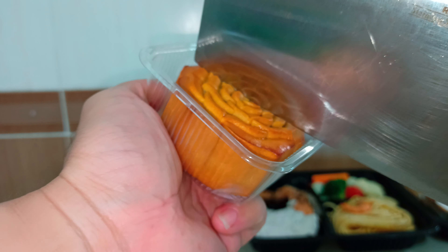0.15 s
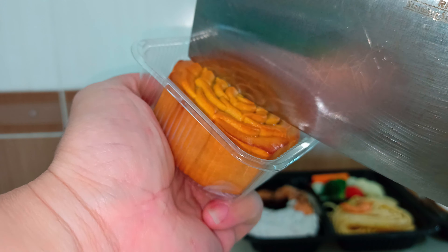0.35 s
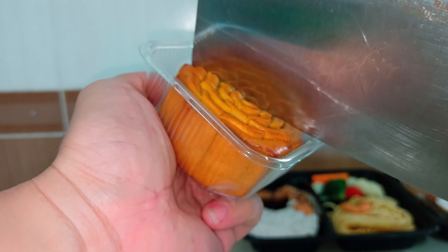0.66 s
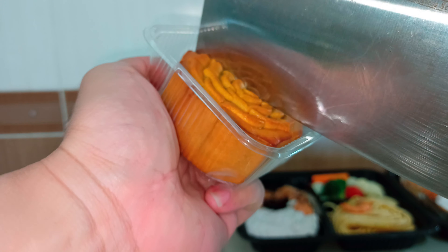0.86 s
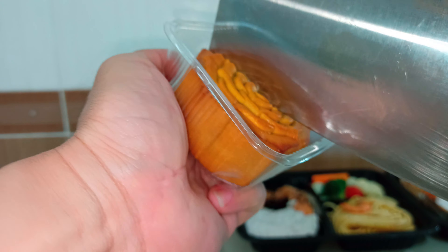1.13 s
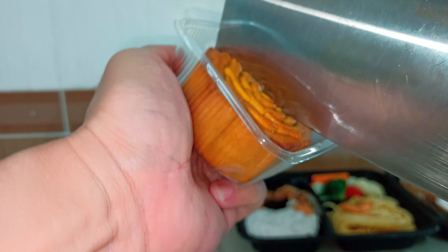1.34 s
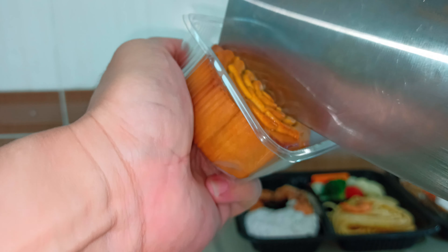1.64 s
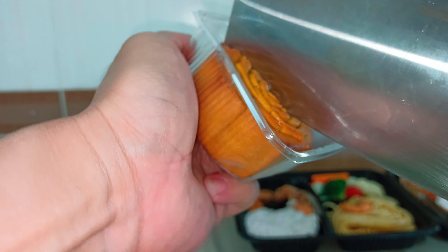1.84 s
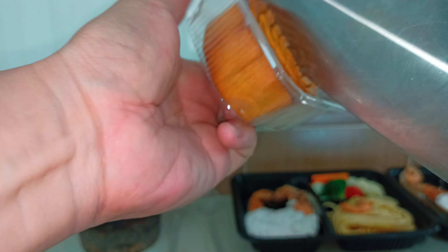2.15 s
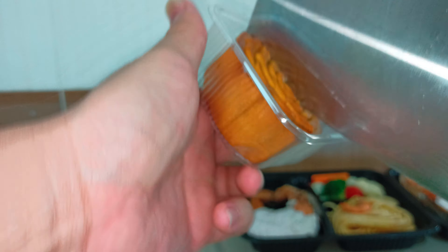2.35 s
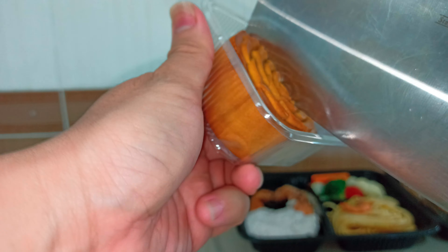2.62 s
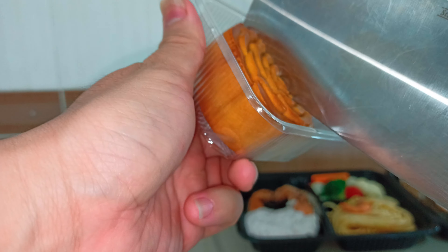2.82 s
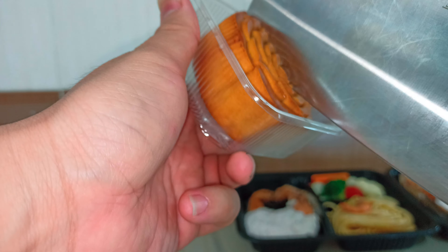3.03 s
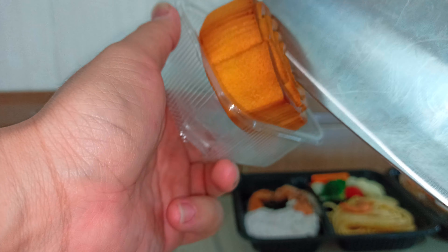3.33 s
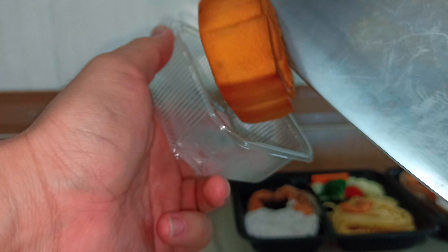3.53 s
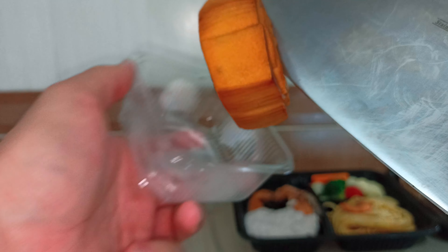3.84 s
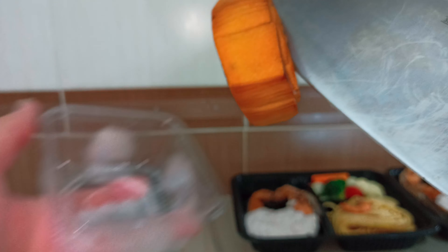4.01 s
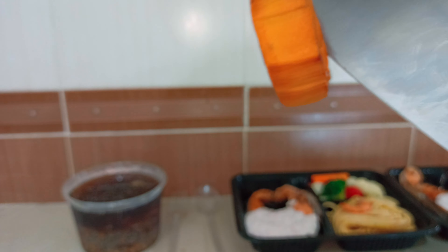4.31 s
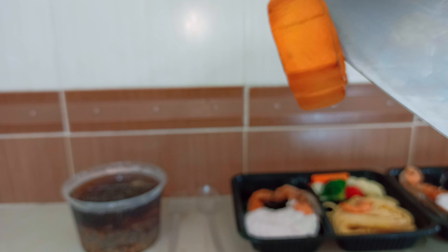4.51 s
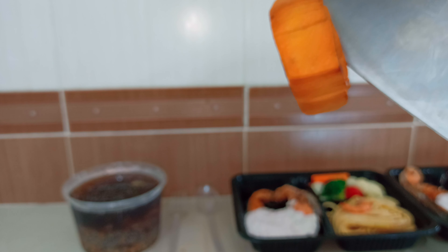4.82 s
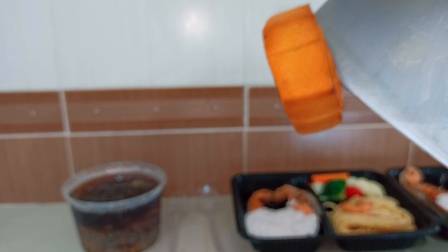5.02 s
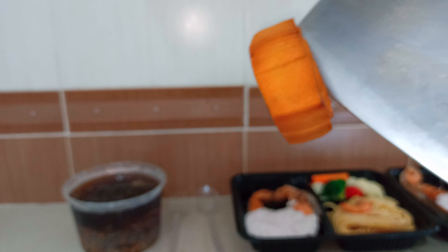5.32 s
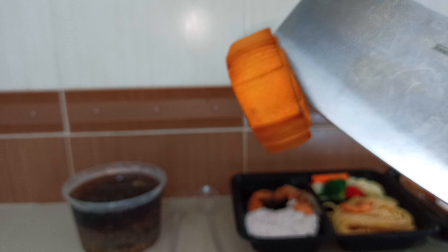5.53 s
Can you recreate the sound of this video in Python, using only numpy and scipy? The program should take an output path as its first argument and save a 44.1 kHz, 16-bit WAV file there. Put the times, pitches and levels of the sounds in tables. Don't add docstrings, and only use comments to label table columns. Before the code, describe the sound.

A close, dry-edged capture in a tiled kitchen, with soft room air and a low wavering machine hum throughout, slightly stronger until about 3 s. A thin plastic tray ticks faintly from the start, then snaps loudly and crisply at 0.33, 0.51 and 0.65 s, each with a short bright room tail. Fingers rub near 0.9 s amid scattered small ticks; at 1.45 s a bright crunch lands with a hollow, slightly ringing knock. From 2.0 to 2.15 s the walls crackle in a rapid burst, ending in the loudest, hard double snap with a low thud. Lighter ticks and dull skin rubbing thin out through 3.4 s. It is nearly quiet until about 4.4 s, apart from a faint brush and tick near 4.1 s. Hissier finger slides and small ticks follow until 5.2 s. From 5.3 to 5.6 s something soft crumples in two quick crunchy pulses and fades.

```python
import sys
import numpy as np
from scipy import signal
from scipy.fft import rfft, irfft
from scipy.io import wavfile
from scipy.ndimage import uniform_filter1d, minimum_filter1d

SR = 44100
rng = np.random.default_rng(int(sys.argv[2]) if len(sys.argv) > 2 else 0)


def materialize(psi):
    bounded = np.clip(np.atleast_2d(psi).T, -1, 1)
    quanta = np.round(bounded * 32767).astype(np.int16)
    wavfile.write(sys.argv[1], SR, quanta)


def to_linear_factor(level_db):
    exponent = np.asarray(level_db, float) / 20
    return 10 ** exponent


N = 249606

BAND_HZ = [2830, 4430, 7170, 15100]


def evened(x):
    return x / np.sqrt(np.mean(x ** 2) + 1e-20)


def read(points, hz):
    f, value = np.transpose(points)
    return np.interp(np.log(hz + 1), np.log(f + 1), value)


def coloured(x, points):
    gain = to_linear_factor(read(points, np.fft.rfftfreq(len(x), 1 / SR)))
    return irfft(rfft(x) * gain, len(x))


def add(mix, start_s, sound):
    part = mix[round(start_s * SR):][:len(sound)]
    part += sound[:len(part)]


def ring(hz, db, t60_s, size=4096):
    t = np.arange(size) / SR
    return to_linear_factor(db - 60 * t / t60_s) * np.sin(2 * np.pi * hz * t)


def grains(spread_db):
    flicker = evened(uniform_filter1d(rng.exponential(1, N) - 1, 40))
    return rng.standard_normal(N) * to_linear_factor(spread_db * np.minimum(flicker, 2))


def hum():
    # frequency [Hz], level per Hz [dB]
    air_colour = [(12, -47.5), (20, -20), (147, -0.5), (189, -10), (251, -5), (566, -16.5), (1430, -25),
                  (1790, -23.5), (2010, -30.5), (3620, -29), (6710, -36.5), (7950, -31.5), (9950, -46.5),
                  (15200, -40.5), (16500, -60)]
    # time [s], level [dB]
    rumble = [(0.0, -50.5), (.6, -47), (1.95, -46), (2.16, -44.5), (2.55, -46), (2.96, -46), (3.21, -51.5),
              (3.85, -54), (5.23, -55), (5.53, -47), (5.66, -52.5)]
    # frequency [Hz], width [Hz], level [dB]
    lines = [(48.6, 10, -67.5), (96.9, 11, -59.5), (145.6, 4, -56), (242.2, 7.7, -64), (298, 11, -64),
             (389, 15, -66), (486.3, 7.3, -64), (1815, 7, -76), (8000, 940, -76.5)]
    hz, t = np.fft.rfftfreq(N, 1 / SR), np.arange(N) / SR
    air = to_linear_factor(-53) * evened(coloured(rng.standard_normal(N), air_colour))
    s, db = np.transpose(rumble)
    swell = to_linear_factor(np.interp(t, s, db) - min(db))
    low = coloured(air, [(450, -3.0), (900, -18)])
    out = air + (swell - 1) * low
    for line_hz, width_hz, line_db in lines:
        resonance = 1 + (2 * (hz - line_hz) / width_hz) ** 2
        line = evened(irfft(rfft(rng.standard_normal(N)) / resonance, N))
        if width_hz < 100:
            line = line + 1.3 * np.sin(2 * np.pi * (line_hz * t + rng.random()))
        out += to_linear_factor(line_db) * evened(line)
    return out


def fingers():
    # frequency [Hz], level per Hz [dB]
    rub_colour = [(350, -36.5), (600, -11), (961, 2), (1580, -5.5), (8250, -3.5), (10400, -14.5),
                  (14200, -10.5), (15800, -8), (16500, -26)]
    # time [s], pressure as level [dB]
    grip = [(0.0, -76), (.118, -69), (.32, -63), (.6, -76), (.8, -63), (.896, -47.5), (1.062, -51),
            (1.236, -63), (1.876, -65), (1.98, -57), (2.3, -50), (2.55, -54), (2.632, -56), (2.844, -59.5),
            (3.016, -56.5), (3.202, -64), (3.45, -70.5)]
    # time [s], pressure as level [dB]
    put_away = [
        (4.36, -64),
        (4.446, -65),
        (4.57, -56),
        (4.74, -63),
        (4.948, -67),
        (5.18, -73),
        (5.28, -68),
    ]
    # start [s], length [s], level [dB], hiss over level [dB]
    brushes = [(0.133, 0.052, -58, -18), (0.862, 0.082, -59.5, -2), (2.62, .06, -65, -3),
               (3.104, .066, -63, -8), (3.47, 0.051, -71, 3), (4.04, 0.041, -71, -4),
               (4.399, 0.057, -60, 0), (4.503, .055, -66.5, 2), (4.583, 0.032, -59, -3),
               (4.781, .032, -59.5, -6), (4.905, .051, -62.5, -5), (5.148, 0.054, -62, -8.5)]
    light_db = -59.5
    t = np.arange(N) / SR
    rub = coloured(grains(2.5), rub_colour)
    dull = evened(coloured(rub, [(8000, -7.0), (9500, -20)]))
    bright = evened(coloured(rub, [(8000, -24), (9500, -7.0)]))
    power = np.zeros((2, N))
    for slide, light_hiss_db, slope in ((grip, -76, .3), (put_away, -63.5, 1.1)):
        s, db = np.transpose(slide)
        press_db = np.interp(t, s, db)
        hiss_db = light_hiss_db + slope * (press_db - light_db)
        touching = (t >= s[0]) * (t <= s[-1])
        power += touching * to_linear_factor(np.array([press_db, hiss_db]) - 5.5) ** 2
    for start_s, length_s, db, hiss_db in brushes:
        touching = (t >= start_s) * (t <= start_s + length_s)
        power += touching * to_linear_factor(np.array([[db], [db + hiss_db]])) ** 2
    dull_level, bright_level = np.sqrt(abs(uniform_filter1d(power, 500)))
    return dull_level * dull + bright_level * bright


def shares(patch_hz, sparkle_db, focus_db):
    away = np.log2(np.array(BAND_HZ[:-1]) / patch_hz) / 0.65
    return [*(focus_db * (np.exp(-away ** 2) - 1)), sparkle_db]


def snap(row, burst_db, slips_db, slips_t60_s, send_db, boost_db=0.):
    band_db = [1.5, 0, -4, -7.5]
    # frequency [Hz], level [dB], t60 [s]
    wall = [(2870, -9, 0.016), (1780, -10.5, .03), (7400, -20, .012), (4400, -24.5, .015)]
    start_s, peak_db, *patch = row
    t = np.arange(2048) / SR
    release = -1. * (np.arange(len(t)) == 48)
    decay = to_linear_factor(burst_db - 60 * t / .0035) + to_linear_factor(slips_db - 60 * t / slips_t60_s)
    slips = rng.standard_normal(len(t)) * decay
    slips = release + np.roll(slips, 50) * (np.arange(len(t)) > 50)
    level_db = np.add(shares(*patch), band_db)
    low_db = level_db[0]
    colour = [(500, low_db - 34.5), (1400, low_db - 17.5), (2000, low_db - 8), *zip(BAND_HZ, level_db)]
    colour.insert(-1, (10500, min(level_db[-2:])))
    modes = sum(ring(hz * rng.uniform(1.0, 1.02), db - 30, t60, size=2048) for hz, db, t60 in wall)
    near, far = (coloured(x + signal.fftconvolve(x, modes)[:len(t)], colour) for x in (slips, release))
    near *= to_linear_factor(peak_db + boost_db) / abs(near).max()
    far *= to_linear_factor(send_db) * np.linalg.norm(near) / np.linalg.norm(far)
    return start_s, near, far


def tray():
    # start [s], peak [dB], patch pitch [Hz], sparkle [dB], patch prominence [dB]
    snaps = [
        (0.3301, -1.5, 4590, -6.5, 6),
        (.5090, 0, 7170, -2.5, 13),
        (.6512, 0, 3150, 1, 11),
        (2.1408, 3, 6200, -16, 18.5),
    ]
    rebound = (2.1418, 3.5, 6300, -15, 19.5)
    # start [s], peak [dB], pitch [Hz], sparkle [dB], prominence [dB]
    crunches = [
        (0.533, -12.5, 2830, -23, 7.5),
        (1.453, -15.5, 7640, -4, 4),
        (1.9957, -20, 3694, -36, 28),
        (2.0779, -1.5, 2830, -16, 9),
        (5.3005, -42, 2830, -13.5, 13),
        (5.3307, -26, 2830, -12, 2),
        (5.3753, -23.5, 7170, -14, 7.4),
    ]
    # start [s], peak [dB], pitch [Hz], sparkle [dB]
    ticks = [(.0604, -42, 4000, -22), (.1481, -36, 2830, -16), (.1618, -30, 7170, -3),
             (.2106, -36.5, 2830, -13), (.24, -36, 2830, -5), (.252, -35, 6800, -2),
             (0.3022, -29.5, 2830, -7), (.819, -35, 6000, -11), (.9032, -24.5, 6300, -7),
             (.9973, -35, 4000, -6), (1.0268, -27, 2870, -19), (1.0933, -39, 7170, -3),
             (1.145, -37.5, 2830, -5), (1.2027, -43.5, 6800, -9), (1.2465, -41.5, 7170, -7),
             (1.3046, -42, 3300, -7), (1.384, -46, 7600, -4), (1.436, -39, 7000, -6),
             (1.4414, -31, 7000, -19), (1.7579, -42, 7400, -6), (1.8282, -36, 6860, -3),
             (1.921, -37.5, 4170, -4), (1.943, -38.5, 3470, -9), (1.953, -40.5, 3500, -14),
             (1.932, -44, 3290, -14)]
    # start [s], peak [dB], pitch [Hz], sparkle [dB]
    tipping = [(2.0614, -24, 6000, -12), (2.0703, -17, 7170, -7), (2.0922, -16, 2830, -11),
               (2.1093, -12, 5817, -13), (2.1244, -16, 4000, -16), (2.132, -24, 4000, -18),
               (2.3963, -27, 3400, -13), (2.425, -28, 3970, -20), (2.442, -24.5, 3450, -14),
               (2.4929, -20, 7300, -10), (2.5358, -25.5, 3000, -13), (2.7038, -27.5, 6300, -9),
               (2.8629, -30, 2980, -15), (2.924, -37, 2830, -4), (2.997, -31.5, 3500, -15),
               (4.18, -49, 3200, -16), (4.6443, -34.5, 4430, 10), (4.7331, -43.5, 7300, 2),
               (4.776, -40, 3200, -12.5), (5.44, -31, 4400, -10), (2.556, -40, 4960, -12),
               (2.58, -37, 3500, -15)]
    # start [s], peak [dB], pitch [Hz], t60 [s]
    knocks = [(0.511, -26, 1040, .015), (.535, -33.5, 855, .02), (.652, -26, 1010, .015),
              (1.4542, -18, 350, .05), (1.4548, -27.5, 387.8, .37), (1.4545, -19.5, 2760, .015),
              (1.4545, -31, 2150, .012), (1.4545, -26.5, 780, .02), (1.4542, -28.5, 1300, .015),
              (1.998, -26.5, 830, .03), (2.079, -22, 309, 0.055), (2.081, -17.5, 1046, 0.035),
              (2.079, -15.5, 1780, .05), (2.079, -14, 2390, .04), (2.142, -14.5, 120, 0.019),
              (2.142, -18.5, 700, .015), (2.142, -11, 1350, .008), (2.142, -20.5, 400, .02),
              (2.536, -32, 1020, .03), (2.259, -32.5, 1500, .012), (2.864, -42, 1310, .015),
              (2.704, -41, 1690, .03), (5.301, -46, 1046, .05), (5.301, -44.5, 2550, 0.059),
              (5.332, -39, 330, .1), (5.377, -41, 402, .1), (5.377, -44, 3300, .2), (5.377, -45, 1707, .2)]
    # start s, peak dB, pitch Hz, sparkle dB
    ribs = [(0.1 + 0.1 * k, -46.5, 3000, -12.5) for k in range(5)]
    tick_focus_db = 9
    beam = .45
    # burst dB, later slips dB, slips t60 s, room send dB
    sounds = [snap(row, -6, -23, .03, -7.5 - beam * row[3], boost_db=6) for row in snaps]
    sounds += [snap(row, -7, -10.5, .06, -3.1, boost_db=1.5) for row in crunches]
    sounds += [snap((*row, tick_focus_db), -7.5, -14, .017, -2.5) for row in ticks + tipping + ribs]
    sounds += [snap(rebound, -8, -18.5, .02, -25, boost_db=7)]
    for start_s, db, hz, t60_s in knocks:
        knock = ring(hz, db, t60_s, size=8192)
        sounds.append((start_s, knock, to_linear_factor(-5.5) * knock))
    near, far = np.zeros((2, N))
    for start_s, close, distant in sounds:
        add(near, start_s, close)
        add(far, start_s, distant)
    return near, far


def tiles(x):
    # frequency [Hz], t60 [s]
    decay = [(300, 0.67), (1500, 0.72), (3000, 0.68), (6000, 0.66), (10000, 0.45), (16000, 0.36)]
    # frequency [Hz], level [dB]
    tail_colour = [(300, -0.5), (1500, 1), (3000, -2.5), (6000, -3.5), (10000, 3), (16000, 3)]
    out, turn = np.zeros(N), np.arange(N) / SR * 1.7
    for k in range(3):
        echoes = (rng.random(SR) < .12) * (np.arange(SR) > 260)
        taps = rng.choice([-1., 1.], SR) * echoes
        hz, t, z = signal.stft(taps, SR, nperseg=256)
        z = z * to_linear_factor(read(tail_colour, hz)[:, None] - 60 * t / read(decay, hz)[:, None])
        tail = signal.istft(z, SR, nperseg=256)[1]
        share = np.sqrt(2 / 3) * np.cos(turn + k * np.pi / 3)
        out += signal.fftconvolve(x * share, tail / np.linalg.norm(tail))[:N]
    return out


def crumple():
    # time [s], level [dB]
    strength = [
        (5.29, -59),
        (5.302, -49.5),
        (5.326, -49),
        (5.332, -35.5),
        (5.368, -43.5),
        (5.376, -34.5),
        (5.455, -42.5),
        (5.554, -54.5),
        (5.6, -66),
    ]
    # frequency [Hz], level per Hz [dB]
    crease_colour = [(150, -37), (250, -11), (325, -3.5), (710, -12.5), (3340, -17.5), (8500, -21),
                     (10500, -33.5), (16000, -31)]
    t = np.arange(N) / SR
    s, db = np.transpose(strength)
    level = to_linear_factor(np.interp(t, s, db) - 2.5) * (t > s[0]) * (t < s[-1])
    return uniform_filter1d(level, 200) * evened(coloured(grains(3.1), crease_colour))


def scene():
    # frequency [Hz], level [dB]
    edge = [(15800, 0.15), (16100, -29.5)]
    near, far = tray()
    steady = hum() + fingers() + to_linear_factor(-6.5) * tiles(far) + crumple()
    return (near + coloured(steady, edge))[None]


def roll_off(x):
    return signal.sosfilt(signal.butter(12, 17150, fs=SR, output="sos"), x)


def record(dry):
    # frequency [Hz], level [dB]
    mic = [(28, -23), (45, 0.68), (16400, 0.85), (17000, -24.5), (17300, -69.5)]
    peak_db = 10 * np.log10(abs(uniform_filter1d(dry[0] ** 2, 40)) + 1e-12)
    over_db = np.maximum(peak_db + 18.5, 0)
    ahead_db = -minimum_filter1d(-over_db, 1150, origin=-560)
    fall_db = np.arange(N) * 150. / SR
    held_db = np.maximum.accumulate(ahead_db + fall_db) - fall_db
    duck_db = 0.39 * uniform_filter1d(held_db, 300)
    limited = np.clip(dry[0] * to_linear_factor(-duck_db), -1, 1)
    mix = np.clip(coloured(limited, mic), -1, 1)[None]
    return roll_off(mix)


dry = scene()
out = record(dry)
materialize(out)
```